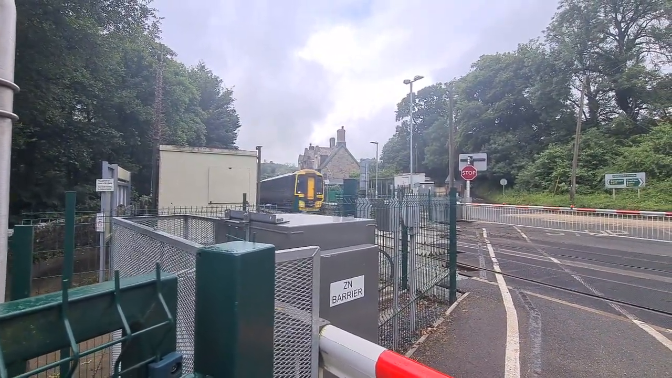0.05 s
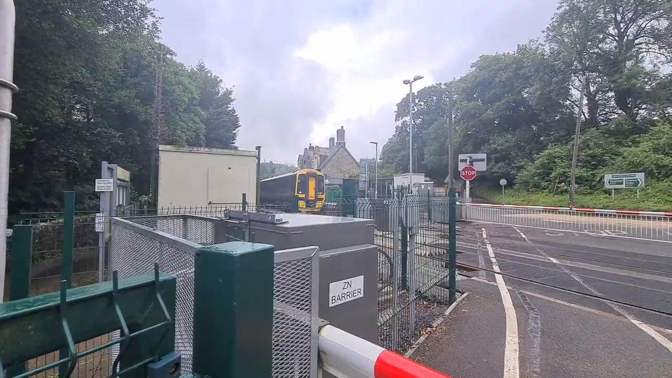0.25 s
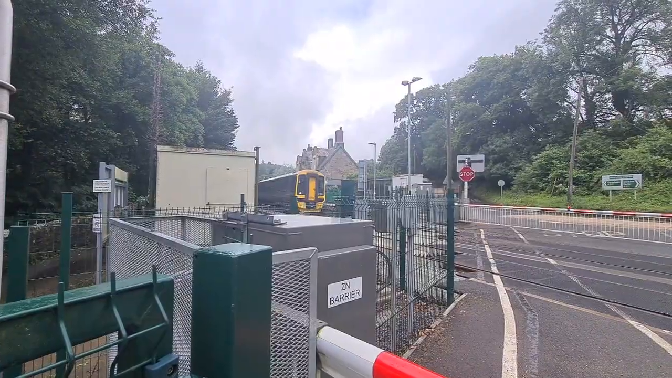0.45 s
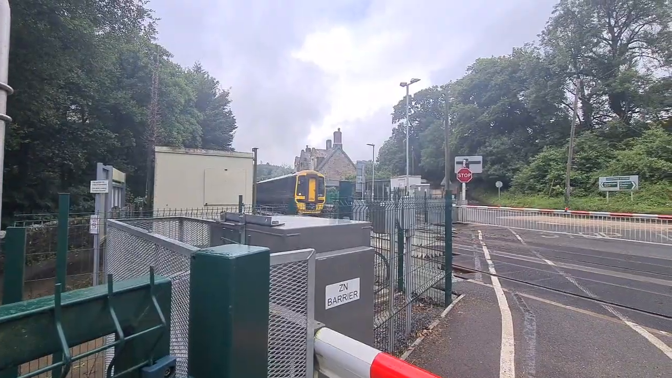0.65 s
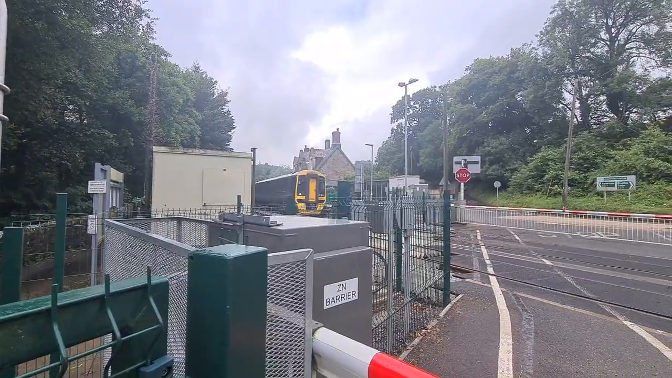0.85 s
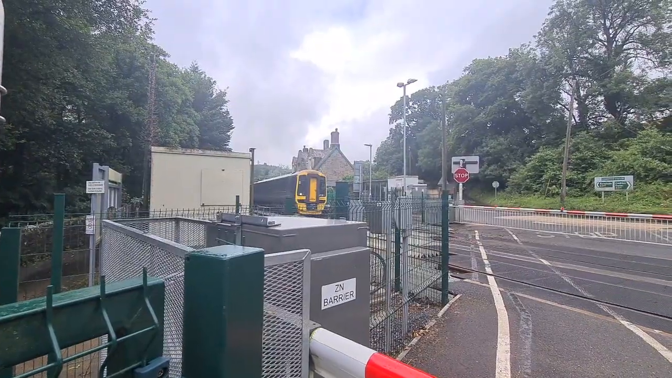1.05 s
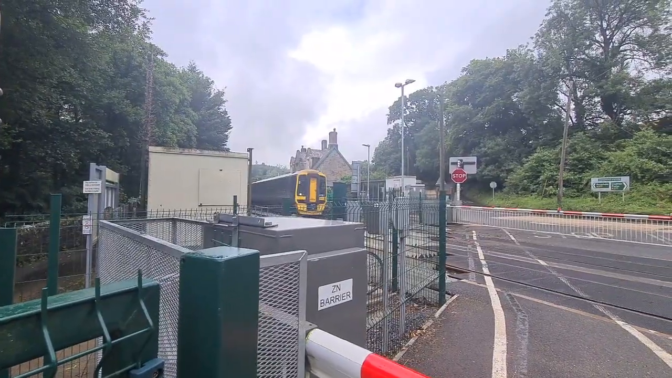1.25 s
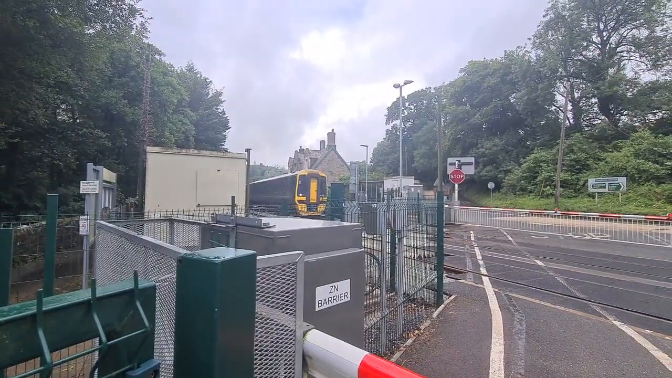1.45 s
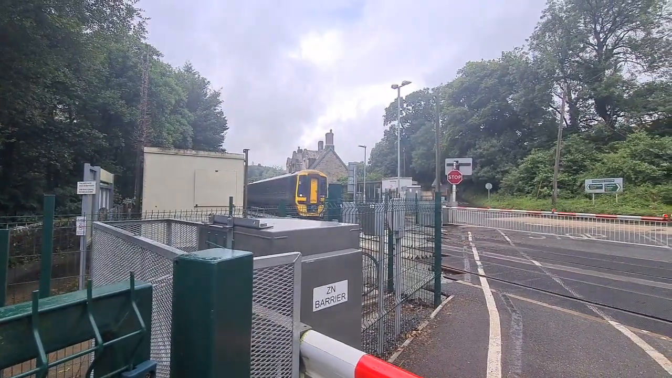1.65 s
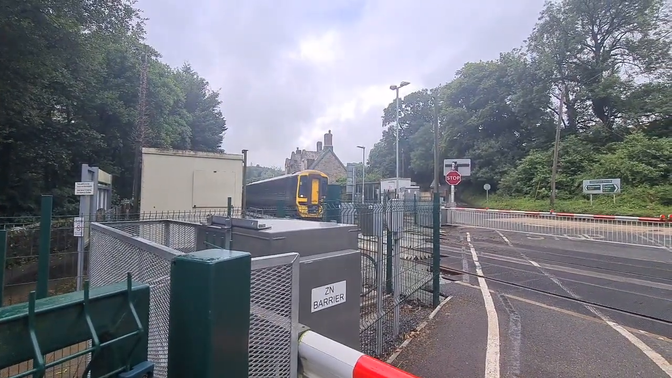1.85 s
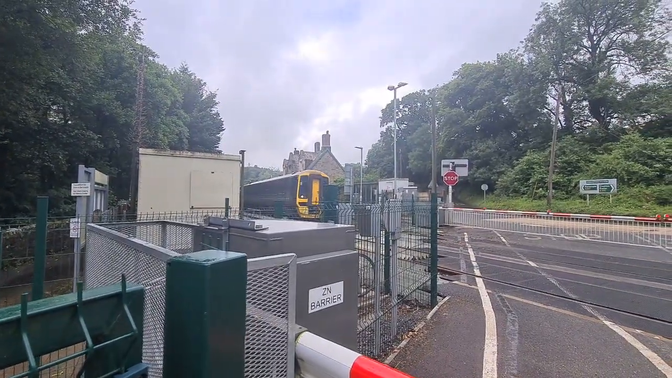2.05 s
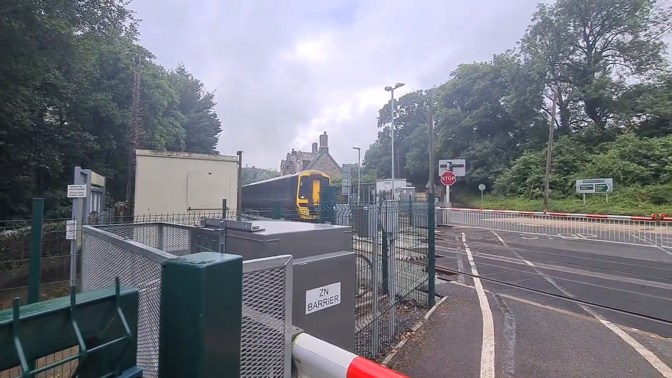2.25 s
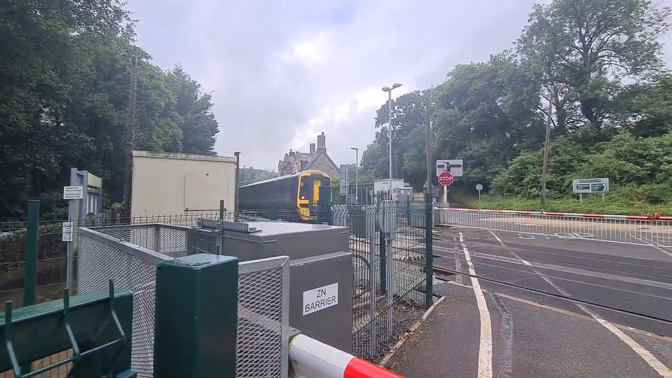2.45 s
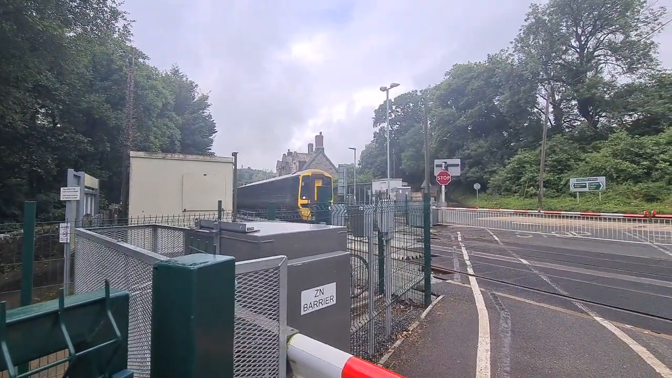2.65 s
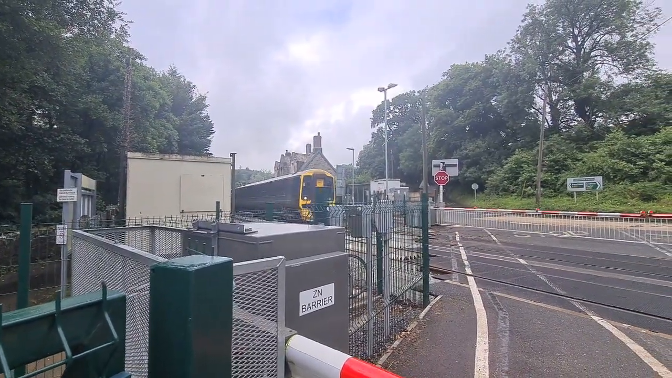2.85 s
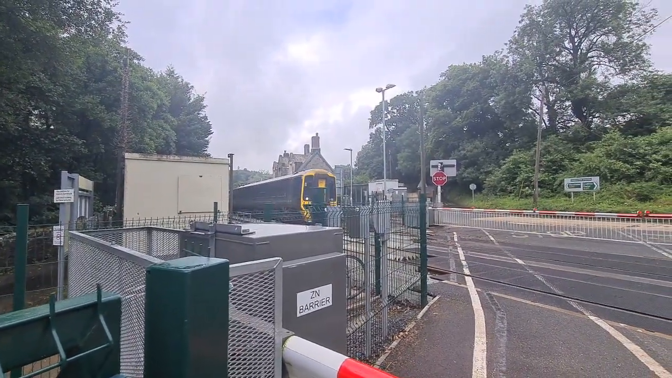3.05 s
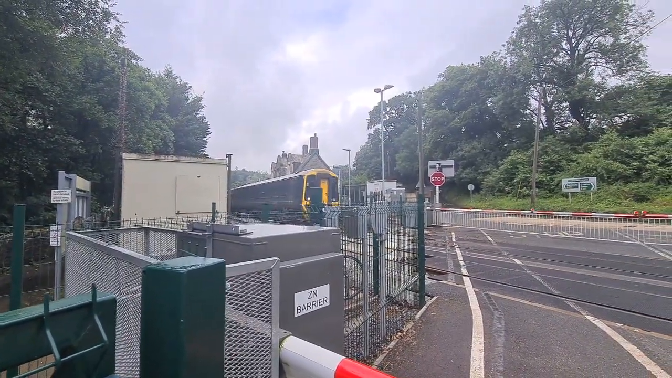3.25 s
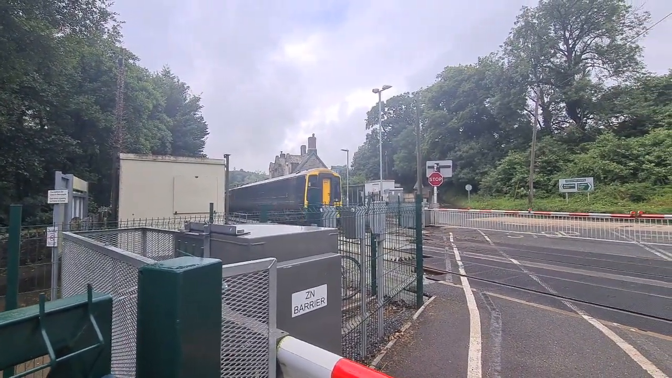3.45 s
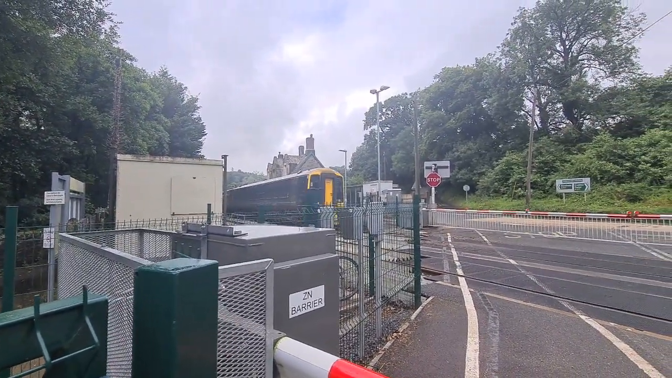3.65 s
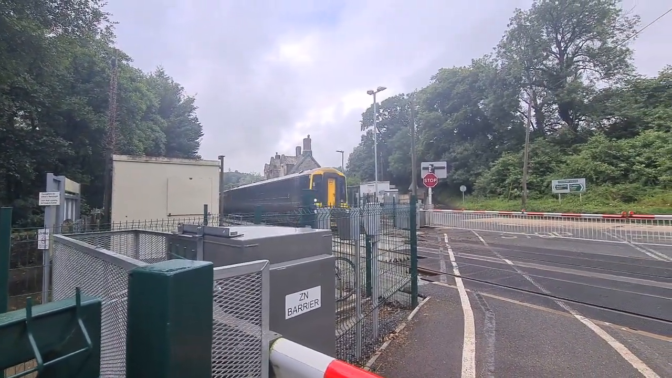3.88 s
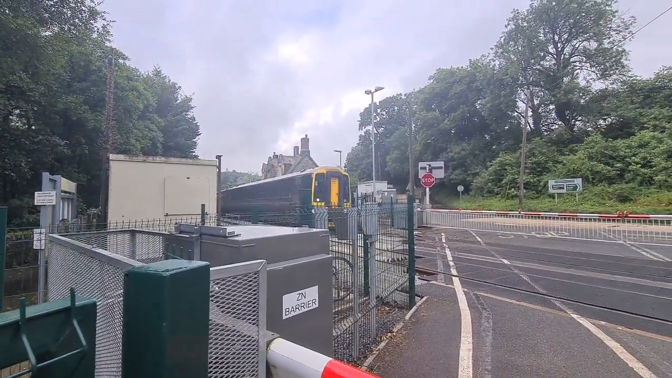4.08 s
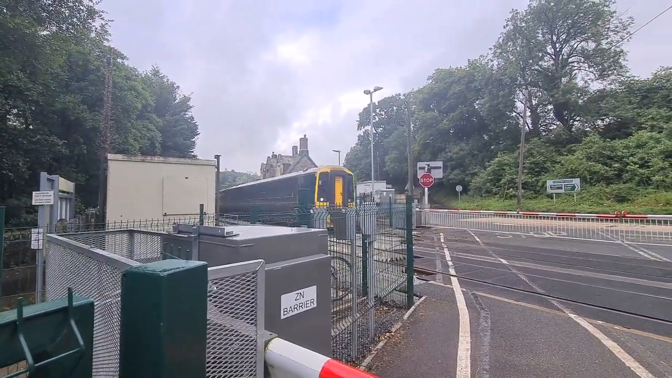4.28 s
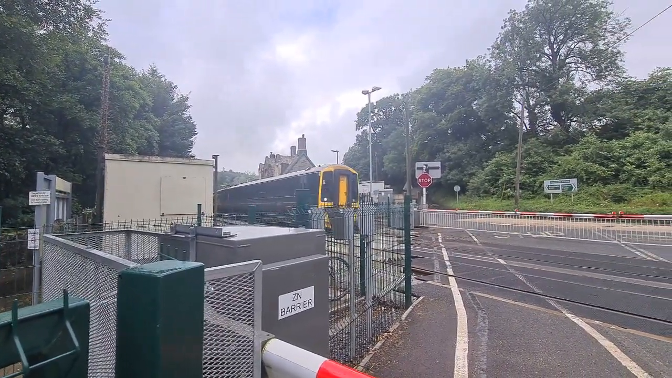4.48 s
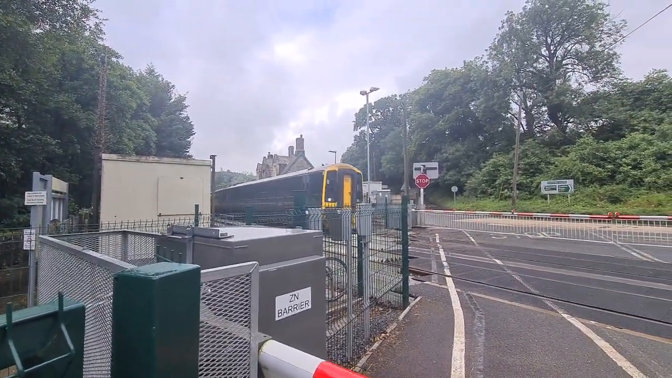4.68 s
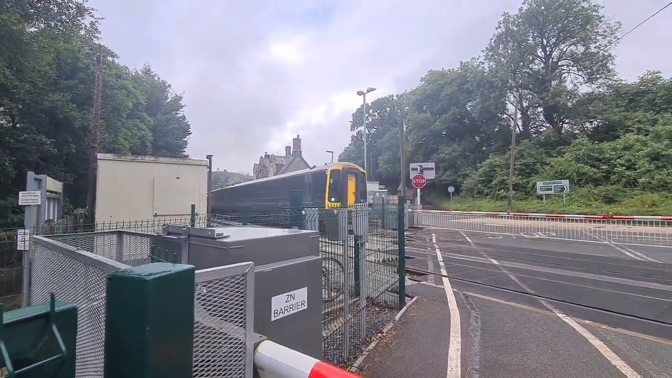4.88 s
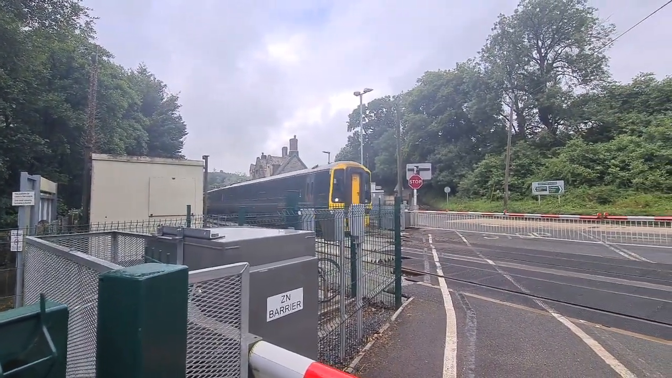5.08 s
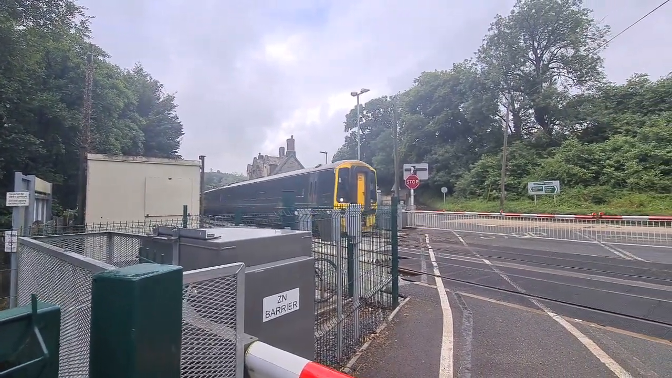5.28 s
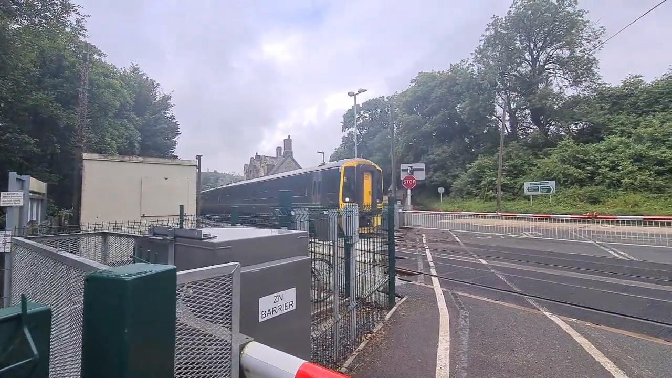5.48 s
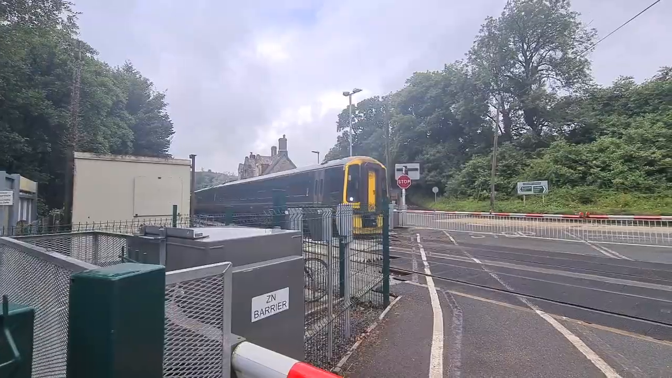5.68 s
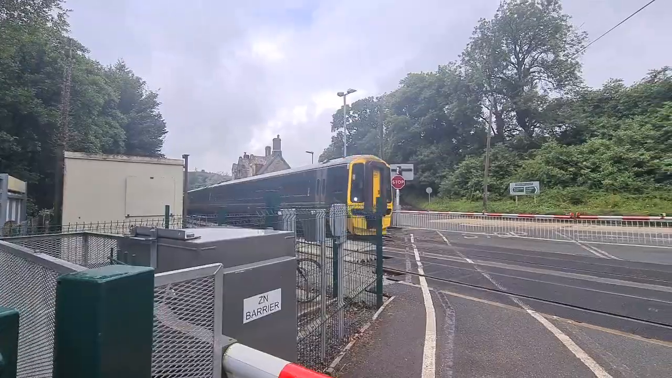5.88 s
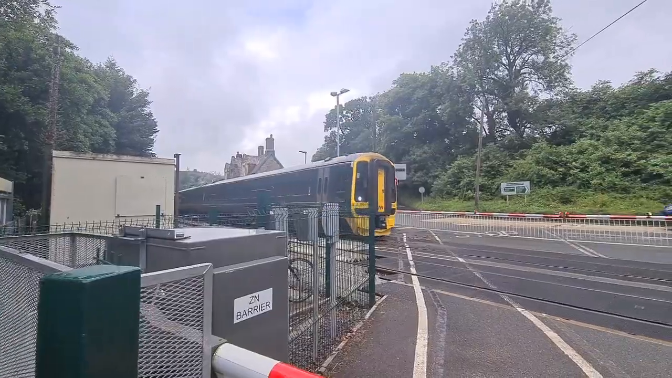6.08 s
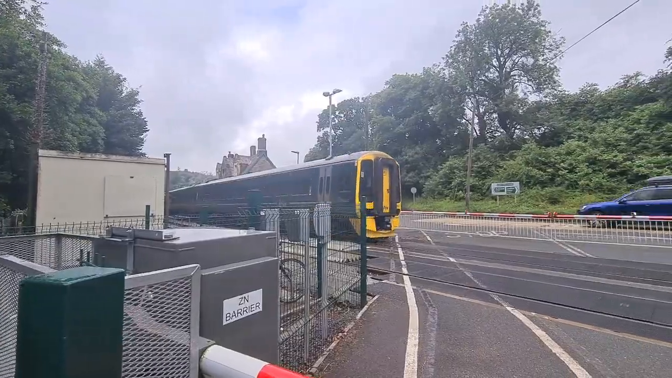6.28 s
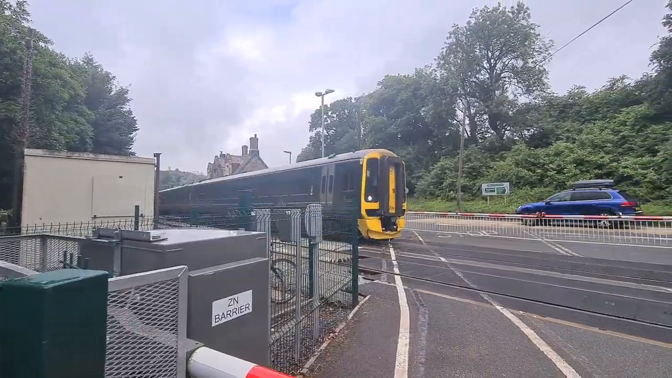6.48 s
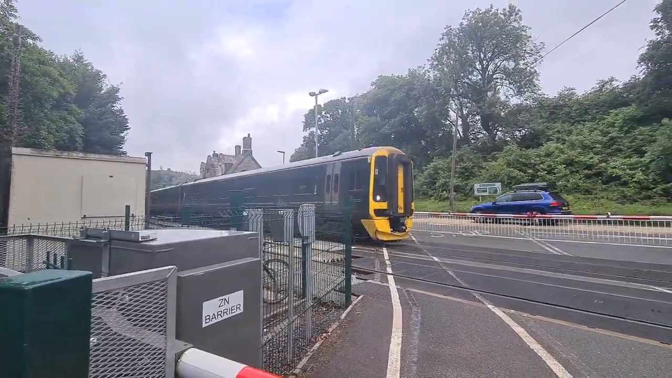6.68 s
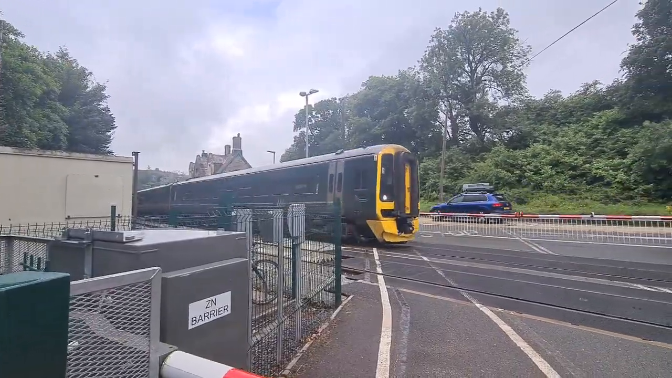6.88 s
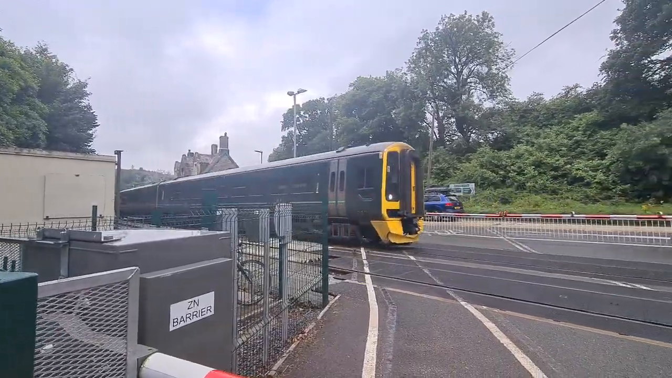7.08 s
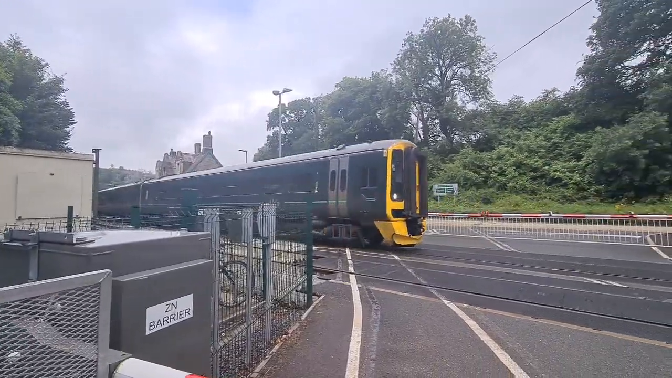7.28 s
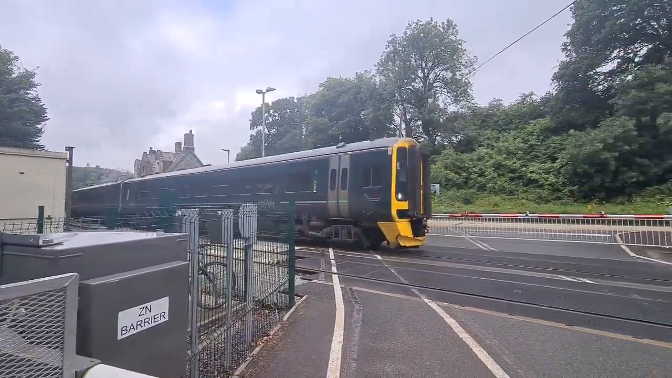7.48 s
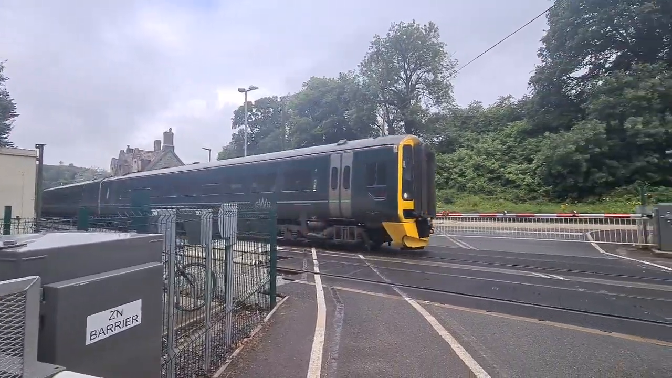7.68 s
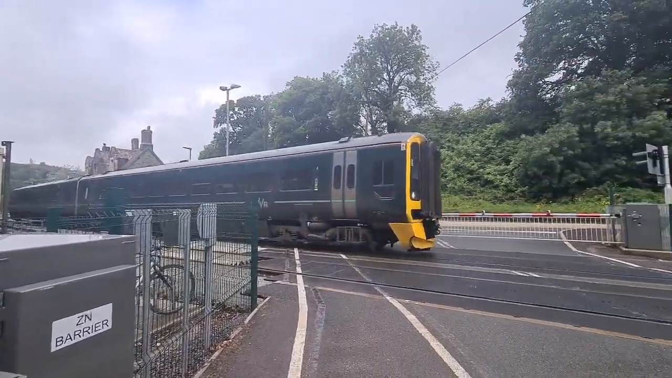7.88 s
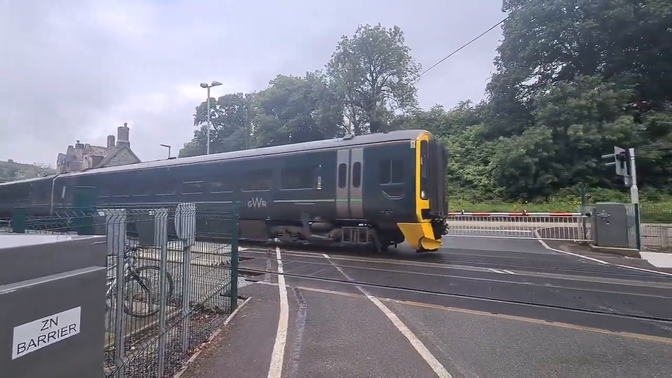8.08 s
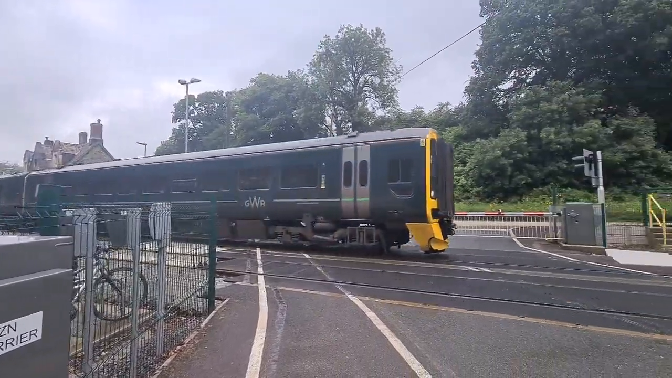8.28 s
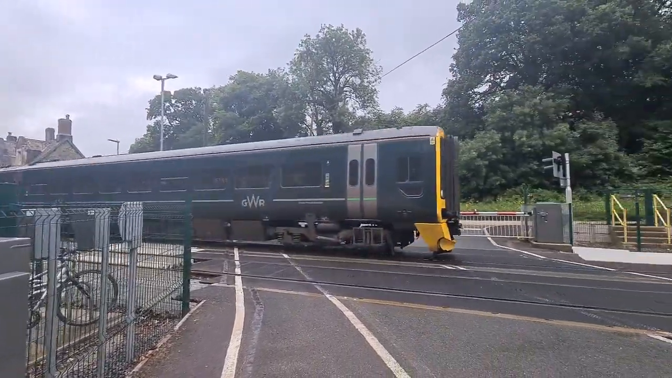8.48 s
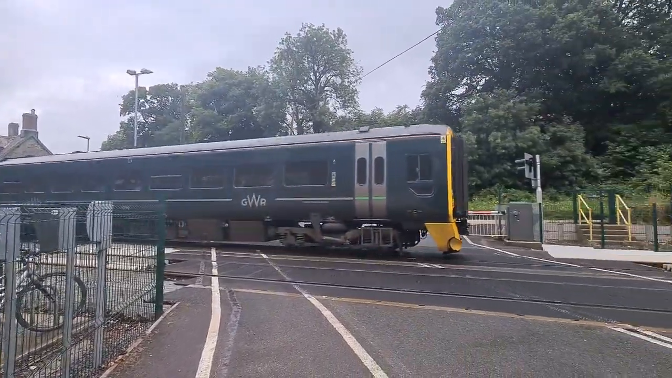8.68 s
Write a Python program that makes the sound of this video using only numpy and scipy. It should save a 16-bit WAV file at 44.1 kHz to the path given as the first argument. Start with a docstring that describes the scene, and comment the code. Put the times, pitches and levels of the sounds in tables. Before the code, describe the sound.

A diesel passenger train pulls away some distance off, its deep engine note pulsing slowly under a hum and faint whines. The rumble and roar grow as it nears. At an outdoor level crossing a hiss swells and the front wheels rumble and knock dully. Then the engine is close and loudest, chugging with gear whine, a light rattle and a thin turbo whistle. The stereo microphone stands beside the track.

```python
"""Two underfloor diesel engines drive a railcar out of a country station and over a level crossing close by.
Their exhaust notes, nearly equal in frequency, beat under gear whine and a turbo whistle.
By spherical spreading the roar grows as the train nears, and its spectrum shifts from far to near.
At the crossing a hiss swells and the front wheels rumble and knock; the bogie rattles, the engine chugs."""
import sys
import numpy as np
from scipy import signal
from scipy.fft import rfft, irfft
from scipy.io import wavfile
from scipy.ndimage import map_coordinates

SR = 44100
rng = np.random.default_rng(int(sys.argv[2]) if len(sys.argv) > 2 else 0)


def store_pcm(level_fs):
    """Save levels as 16-bit WAV."""
    pcm = np.round(np.clip(level_fs, -1, 1) * 32767).astype(np.int16)
    wavfile.write(sys.argv[1], SR, np.atleast_2d(pcm).T)


N = 385434
TIME, BINS = np.arange(N) / SR, np.fft.rfftfreq(N, 1 / SR)

# stereo field: (frequency [Hz], coherence [0-1], phase lead of the left [rad], left minus right [dB])
STEREO_FIELD = [(60, 0.79, 0.15, -2), (150, 1, 0.13, -1.1), (285, 0.98, 0.45, -2.5),
                (600, 0.75, 0.93, -0.7), (1220, 0.56, 1.49, 0.8), (2200, 0.27, 1.6, 0.5),
                (4080, 0.16, 1.77, -0.5), (7540, 0.032, 3.4, 1), (13000, 0.078, 2.9, -3)]
# swells of hiss and of hollow wheel rumble: (crest time [s], level [dB], half length [s], tilt [dB/octave])
HISS_SWELLS = [(6.23, -42.5, 0.39, 1), (6.65, -44, .33, 2.5), (6.98, -43.5, 0.21, -2.5)]
WHEEL_SWELLS = [(4.8, -47, 3.3, -7), (6.45, -40, 0.74, 7)]
# their spectra before the tilt: (frequency [Hz], relative density [dB])
HISS_SPECTRUM = [(1500, -20), (3000, -9), (4500, -1.5), (5300, -3.5), (6400, 1), (7400, -6.5),
                 (9000, -11.5), (15000, -15.5)]
WHEEL_SPECTRUM = [(250, -38), (450, -23), (590, 4.5), (680, 3), (760, 2.5), (900, -3), (1500, -55)]
# dull knocks, wheels at the crossing, then two sharp engine chugs:
# (time [s], relative level [dB], centre frequency [Hz])
KNOCKS = [(6.235, -21, 662), (6.423, -23, 567), (6.529, -20, 660), (6.799, -14.5, 605), (6.903, -20.5, 740),
          (7.835, -20, 905), (8.0, -18, 1120)]
# hums and whines with their own pitch and level curves: (time [s], frequency [Hz], level [dB])
GROWL = [(4, 322.5, -65), (6.5, 317, -48), (7.3, 322.3, -38), (8, 328.4, -25), (8.74, 341.3, -30)]
DRONE = [(0, 204, -51), (2.7, 202, -40.5), (3.4, 201, -38), (4.5, 201, -49), (5.5, 201.6, -43.5),
         (5.9, 201, -34), (7.0, 200.5, -32), (7.7, 203, -39.5), (8.74, 206, -41.5)]  # the engine's hum near 200 Hz
CONVERTER = [(0, 1327, -52), (.8, 1314, -47.5), (1.6, 1297, -56), (2.8, 1255, -49), (3.6, 1243, -49),
             (4.2, 1230, -90)]
REAR_GEARS = [(3.6, 1655, -75), (4.4, 1642, -46), (5.3, 1644, -41.5), (6.4, 1607, -42), (7.3, 1654, -40),
              (7.9, 1628, -32), (8.74, 1655, -53)]
REAR_GEARS_LOW = [(6.8, 1281, -56), (7.5, 1340, -34), (8.2, 1316, -42), (8.74, 1335, -57)]  # the rear engine's lower gear whine
FAN = [(0, 324, -46), (1.4, 314.7, -48.5), (2.2, 309, -54), (3.5, 316, -82)]
TURBO = [(0, 7750, -71), (2, 7960, -65), (4.5, 8000, -62), (6.3, 7870, -61), (7.5, 7860, -54),
         (8.1, 8060, -56), (8.74, 8360, -53)]
INTAKE = [(6.6, 5520, -77), (7.3, 5560, -51), (8, 5590, -55), (8.74, 5700, -64)]
# engine and rolling noise: (frequency [Hz], relative density far [dB], relative density near [dB])
RUMBLE_SPECTRA = [(20, -12, -24), (34, -7.5, -18), (50, 0, -0.5), (76, 5, 9), (115, 2.5, -5.5),
                  (161, 0.5, -3), (202, -4, 0.5), (241, -2.5, -2), (336, -9, 0.5), (364, -3.5, -7.5),
                  (485, -15, -12), (690, -50, -61)]
ROAR_SPECTRA = [(280, -17, -27), (437, -6, -3), (629, 3, 0.5), (708, -3, 0), (770, 3.5, 2), (844, -3.5, -2),
                (1130, -3, -1), (1350, -2, 3), (1560, -2.5, 0.5), (2020, -6.5, -3), (2230, -7, -9.5),
                (3290, -8.5, -9.5), (4340, -17, -17.5), (7700, -35, -42.5)]
FIZZ_SPECTRA = [(2500, -5, -20), (4700, 7, 6.5), (5100, 1.5, 3), (5970, 7.5, 5.5), (6830, 7, 4.5),
                (7420, -0.5, 0), (9000, -2, -0.5), (10800, -3, -1.5), (12000, -5.5, 2), (13300, -6, -5.5),
                (15800, -25, -7)]
# gear meshes: (order [per crank turn, rounded in use], far [dB], near [dB], open gain [dB], width [Hz])
GEAR_MESHES = [(60, -49.5, -41.5, 9.5, 4.6), (71.5, -48, -41, 5.5, 12)]
# crank tones: (order [per crank turn, rounded to halves in use], far [dB], near [dB], scattered [0-1])
CRANK_ORDERS = [(2, -41, -35, 0.64), (4, -59, -45, 1), (6, -49, -36.5, 0.15), (8, -47, -36.5, 0.63),
                (12, -54, -43, 0.63), (35.74, -55, -41.5, 0.57), (47.66, -53, -38, 0.95),
                (146.4, -56, -48.5, 0.47)]
# deep exhaust booms: (crest time [s], level [dB], frequency [Hz], half length [s])
BOOMS = [(4.55, -16, 66, 0.026), (5.383, -14.5, 65, 0.022), (5.736, -25.5, 87, 0.033),
         (7.329, -19, 88, 0.031)]
# moments when the engines are in antiphase: (time [s], rear amplitude over front [0-1])
BEAT_MINIMA = [(.34, 1), (.9, 0.98), (1.63, 0.84), (2.782, 0.53), (4.66, 0.34), (5.74, .33), (6.32, 0.8),
               (6.83, 0), (7.63, 0.7)]
# firing of the front engine: (time [s], rate [Hz])
FIRING_RATE = [(0, 68.1), (1.2, 67.9), (2.5, 67.6), (4, 67.1), (5.3, 67), (6.5, 66.6), (7.4, 66.9),
               (8, 67.8), (8.74, 68.8)]
# exhaust note of the front engine: (time [s], level [dB])
EXHAUST_LEVEL = [(0, -21.5), (1.92, -20), (3.66, -22.5), (4.34, -18), (5.8, -24), (6.22, -33), (7.06, -15),
                 (8.74, -15)]


def amp(db):
    """Amplitude ratio of a level in decibels."""
    return 10 ** (np.asarray(db) / 20)


def unit(x):
    """Normalisation to an rms of 1."""
    return x / np.sqrt(np.mean(abs(x) ** 2) + 1e-20)


def bell(crest_s, half_s):
    """Gaussian envelope, down to 1/e at half_s from its crest."""
    return np.exp(-((TIME - crest_s) / half_s) ** 2)


def curves(rows):
    """Linear interpolation of a time table at every sample."""
    s, *columns = np.transpose(rows)
    return [np.interp(TIME, s, c) for c in columns]


def spectra(rows):
    """Log-frequency interpolation of a table at every bin."""
    hz, *columns = np.transpose(rows)
    return [np.interp(np.log(BINS + 1), np.log(hz), c) for c in columns]


def drift(width_hz, count=8192):
    """Random modulation: low-passed complex noise with an rms of 1."""
    hz = np.fft.fftfreq(count, N / SR / count)
    white = rng.standard_normal(count) + 1j * rng.standard_normal(count)
    slow = np.fft.ifft(white / (1 + (hz / width_hz) ** 2))
    return unit(np.interp(np.linspace(0, count - 1, N), np.arange(count), slow))


def stereo_field():
    """Coherence between two points, and the complex gain at each, per bin."""
    coherence, lead, balance_db = spectra(STEREO_FIELD)
    left = amp(balance_db / 2) * np.exp(.5j * lead)
    return np.clip(coherence, 0, 1), np.array([left, 1 / left])


def cohere(a, b, coherence):
    """Partial coherence: two independent signals mix into a correlated pair."""
    return np.array([a, coherence * a + np.sqrt(1 - coherence ** 2) * b])


def noise(spectrum_db, field):
    """Spectral shaping of stereo noise; the mean of both sides has an rms of 1."""
    coherence, sides = field
    a, b = rfft(rng.standard_normal((2, N)))
    x = irfft(cohere(a, b, coherence) * sides * amp(spectrum_db), N)
    return x / x.mean(0).std()


def tone(cycles, scatter, width_hz, field):
    """Multipath: a tone arrives partly direct, partly scattered by ground, fences and trees."""
    mean_bin = min(int(abs(cycles[-1])), len(BINS) - 1)
    coherence, sides = field[0][mean_bin], field[1][:, mean_bin, None]
    scattered = cohere(drift(width_hz), drift(width_hz), coherence)
    paths = np.sqrt(1 - scatter) + np.sqrt(scatter) * scattered
    return np.sqrt(2) * (sides * paths * np.exp(2j * np.pi * cycles)).real


def approach(start_m=59.6, speed_m_s=3.8, accel_m_s2=0.42, offset_m=6.1):
    """Spherical spreading: gain in dB as the train accelerates along a straight track."""
    along = start_m - speed_m_s * TIME - accel_m_s2 * TIME ** 2 / 2
    distance = np.hypot(along, offset_m)
    return 20 * np.log10(distance[0] / distance)


def bearing(x, near, lead_s=.00008):
    """Path difference: sound reaches the left earlier as the train draws alongside."""
    left_time = TIME + lead_s * near ** 6
    return np.array([map_coordinates(x[0], [left_time * SR], order=5, mode="nearest"), x[1]])


def bogie_rattle(near, field, per_s=14, level_db=-29, decay_s=0.014, hz=1000, rolloff_db=7):
    """Poisson impacts in the bogie decay exponentially, audible only close by."""
    hits = (rng.random(N) < per_s / SR) * rng.uniform(.4, 1, N)
    bursts = signal.lfilter([1], [1, -np.exp(-1 / (decay_s * SR))], hits)
    spectrum_db = -rolloff_db * np.log2((BINS + 1) / hz) ** 2
    return amp(level_db) * near ** 6 * bursts * noise(spectrum_db, field)


def crossing_swells(rows, spectrum, field, flicker_db):
    """Amplitude modulation: hiss or wheel rumble flickers under Gaussian envelopes."""
    low_hz, high_hz = spectrum[0][0], spectrum[-1][0]
    octaves = np.log2(np.clip(BINS, low_hz, high_hz) / low_hz)
    base_db = spectra(spectrum)[0]
    total = sum(amp(db) * bell(s, half) * noise(base_db + tilt * octaves, field)
                for s, db, half, tilt in rows)
    return total * amp(flicker_db * drift(45).real)


def knocks(t60_s=0.11, band_ratio=1.3, level_db=-5):
    """Damped transients: dull wheel knocks at the crossing, then two sharp engine chugs."""
    out = np.zeros((2, N))
    t = np.arange(SR // 4) / SR
    for s, db, hz in KNOCKS:
        band = signal.butter(2, [hz / band_ratio, hz * band_ratio], "band", fs=SR, output="sos")
        excitation = rng.standard_normal(len(t)) + .5 * rng.standard_normal((2, len(t)))
        ring = unit(signal.sosfilt(band, excitation))
        start = int(s * SR)
        out[:, start:start + len(t)] += amp(db + level_db - 60 * t / t60_s) * ring
    return out


def whine(rows, field, scatter, width_hz):
    """Periodic forcing: a hum or whine follows its pitch and level curves."""
    hz, db = curves(rows)
    return amp(db) * tone(np.cumsum(hz) / SR, scatter, width_hz, field)


def throb(crank, near, far_depth=.05, near_depth=0.33, sharpness=6.8, crest_s=8.45):
    """Modulation by one chug per four-stroke cycle; echoes make it shallow at a distance."""
    cycles = (crank - np.interp(crest_s, TIME, crank)) / 2
    chug = np.exp(sharpness * (np.cos(2 * np.pi * cycles) - 1))
    depth = far_depth + (near_depth - far_depth) * near ** 4
    return 1 + depth * (chug - chug.mean())


def rush(rows, near, field):
    """Incoherent addition: far and near noise cross-fade at equal power."""
    far_db, near_db = spectra(rows)
    return np.sqrt(1 - near) * noise(far_db, field) + np.sqrt(near) * noise(near_db, field)


def running_noise(crank, firings, closer_db, near, field):
    """Broadband engine and rolling noise grows with nearness; firing and rotation modulate its body."""
    surge_db = 2.4 * bell(5.6, 1)  # before the crossing
    deck_db = 2.2 * bell(6.37, 0.78)  # the front wheels run onto it
    rumble_gain = amp(-34.5 + 1.03 * closer_db + surge_db + .5 * drift(3.3).real)
    roar_gain = amp(-40.5 + 1.118 * closer_db + deck_db)
    fizz_gain = np.hypot(amp(-51.5), amp(-60 + 1.23 * closer_db)) * amp(0.94 * drift(15).real)
    pulse = 1 + 0.047 * np.cos(2 * np.pi * firings) + 0.038 * np.cos(2 * np.pi * crank)
    rumble = rumble_gain * rush(RUMBLE_SPECTRA, near, field)
    roar = roar_gain * throb(crank, near) * rush(ROAR_SPECTRA, near, field)
    return (rumble + roar) * pulse + fizz_gain * rush(FIZZ_SPECTRA, near, field)


def gear_whine(crank, near, field, scatter=0.58, flare_db=3.6, open_s=6.72, opening_s=0.17):
    """Tooth-mesh tones flare at random and rise on leaving the acoustic shadow of lineside cabinets."""
    in_open = .5 + .5 * np.tanh((TIME - open_s) / opening_s)
    out = 0
    for order, far_db, near_db, open_db, width_hz in GEAR_MESHES:
        level_db = far_db + (near_db - far_db) * near + open_db * in_open + flare_db * drift(14).real
        out += amp(level_db) * tone(crank * np.round(order), scatter, width_hz, field)
    return throb(crank, near) * out


def crank_tones(crank, near, field, width_hz=1.0, hz_per_order=0.25):
    """Harmonics of the four-stroke cycle, whose line width grows with their order."""
    out = 0
    for order, far_db, near_db, scatter in CRANK_ORDERS:
        level_db = far_db + (near_db - far_db) * near
        cycles = crank * np.round(2 * order) / 2
        out += amp(level_db) * tone(cycles, scatter, width_hz + hz_per_order * order, field)
    return out


def exhaust(firings, field, flutter=0.06, lope=0.024, first_beat_s=0.45, last_beat_s=1.44):
    """Interference: two exhaust notes beat, lope from unequal cylinders, and now and then boom."""
    level_db, rear = curves(EXHAUST_LEVEL)[0], curves(BEAT_MINIMA)[0]
    minima = [s for s, _ in BEAT_MINIMA]
    opposed = [minima[0] - first_beat_s, *minima, minima[-1] + last_beat_s]
    lag = 2 * np.pi * np.interp(TIME, opposed, np.arange(len(opposed)))  # rear loses a firing per beat
    pair = np.exp(2j * np.pi * firings) * (1 - rear * np.exp(-1j * lag))
    uneven = 1 + flutter * drift(14) + lope * np.cos(np.pi * firings / 3)
    note = np.sqrt(2) * amp(level_db) * pair * uneven
    for s, db, hz, half in BOOMS:
        phase = np.angle(note[int(s * SR)]) + 2 * np.pi * hz * (TIME - s)  # in step at the crest
        note += amp(db) * bell(s, half) * np.exp(1j * phase)
    sides = field[1][:, int(firings[-1]), None]
    return (sides * note).real


def scene():
    """Superposition of all the train's sources in stereo."""
    field, closer_db = stereo_field(), approach()
    near = np.clip(closer_db / 11, 0, 1)  # the timbre is fully near after 11 dB of approach
    firings = np.cumsum(curves(FIRING_RATE)[0]) / SR
    crank = firings / 3  # turns: six cylinders fire three times in each
    engines = exhaust(firings, field) + crank_tones(crank, near, field) + gear_whine(crank, near, field)
    engines += running_noise(crank, firings, closer_db, near, field)
    whines = (whine(GROWL, field, scatter=0.76, width_hz=18)
              + whine(DRONE, field, scatter=0.86, width_hz=2.1)
              + whine(CONVERTER, field, scatter=0.86, width_hz=5.8)
              + whine(REAR_GEARS, field, scatter=0.98, width_hz=6.1)
              + whine(REAR_GEARS_LOW, field, scatter=0.77, width_hz=38)
              + whine(FAN, field, scatter=0.06, width_hz=2.9)
              + whine(TURBO, field, scatter=0.99, width_hz=120)
              + whine(INTAKE, field, scatter=0.95, width_hz=80))
    wheels = crossing_swells(WHEEL_SWELLS, WHEEL_SPECTRUM, field, flicker_db=6)
    transients = knocks() + bogie_rattle(near, field)
    hiss = crossing_swells(HISS_SWELLS, HISS_SPECTRUM, field, flicker_db=2.5)
    return bearing(engines + whines + wheels + transients + hiss, near)


def record(dry):
    """Band limiting: a low-pass filter follows a brief taper at each end."""
    taper = signal.windows.tukey(N, .0005)
    low_pass = signal.firwin(511, 15850, window=("kaiser", 9), fs=SR)
    return signal.oaconvolve(dry * taper, low_pass[None], "same")


dry = scene()
out = record(dry)
store_pcm(out)
```